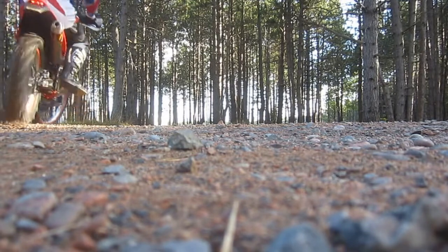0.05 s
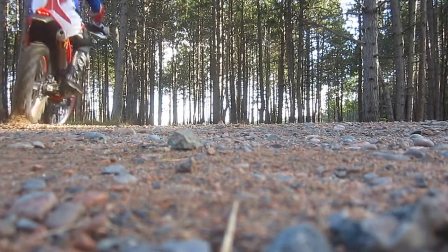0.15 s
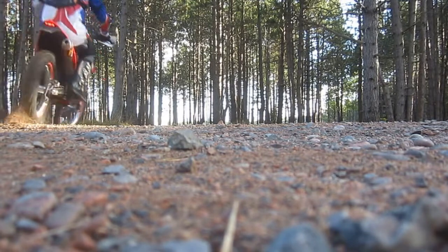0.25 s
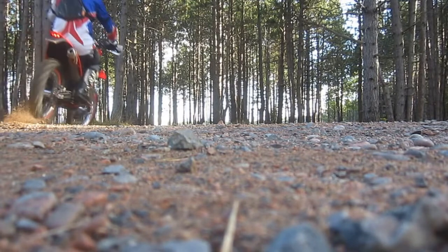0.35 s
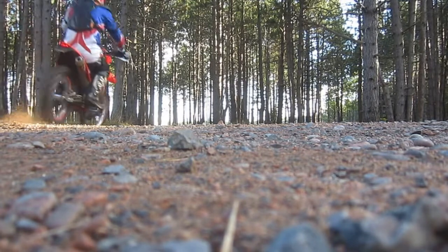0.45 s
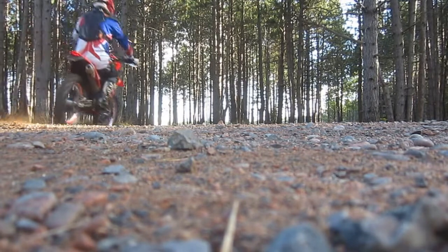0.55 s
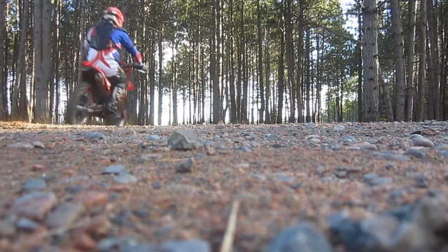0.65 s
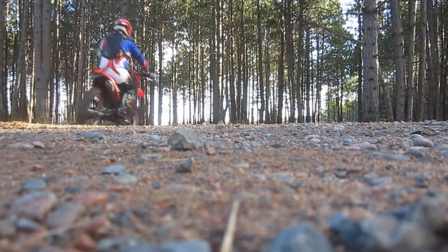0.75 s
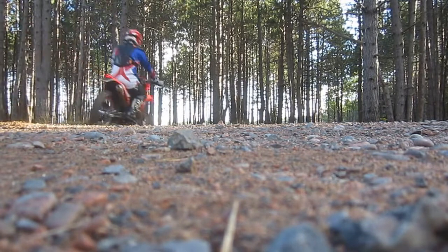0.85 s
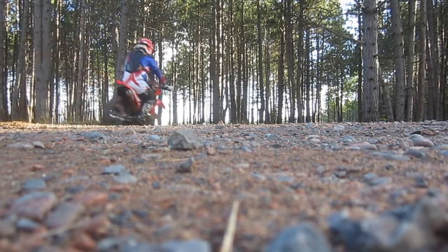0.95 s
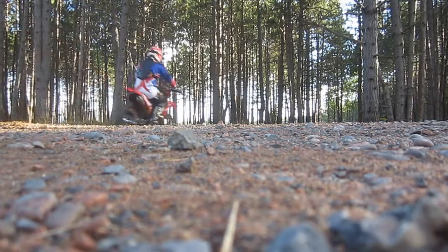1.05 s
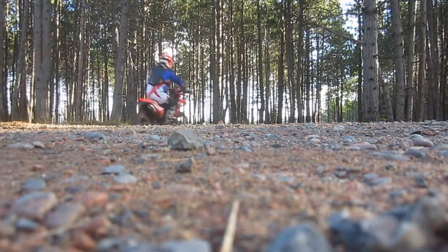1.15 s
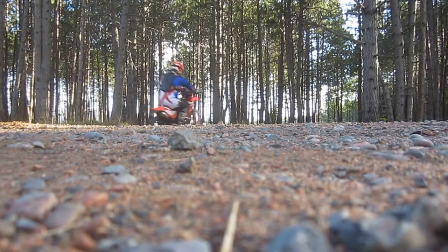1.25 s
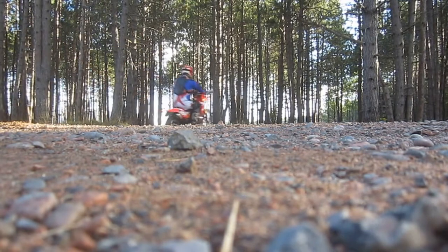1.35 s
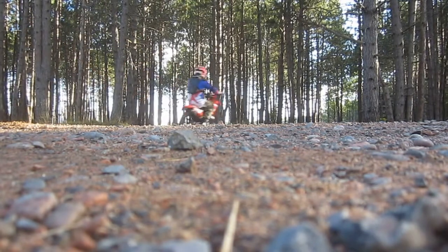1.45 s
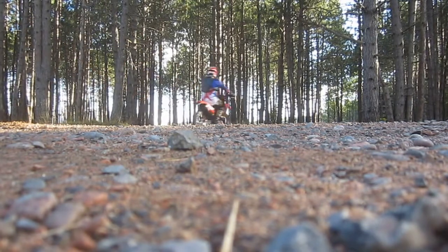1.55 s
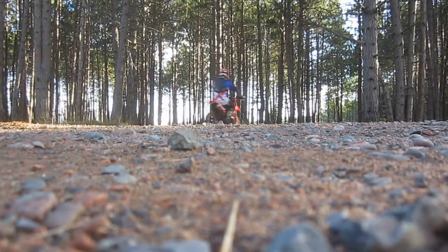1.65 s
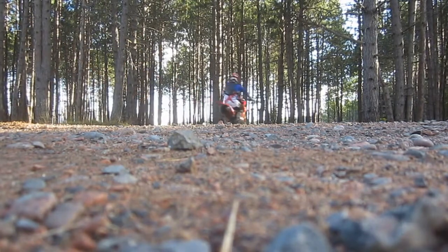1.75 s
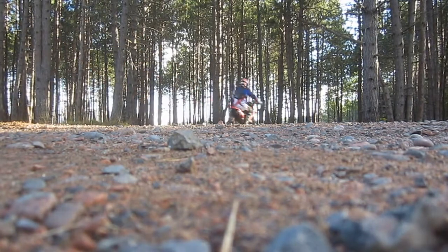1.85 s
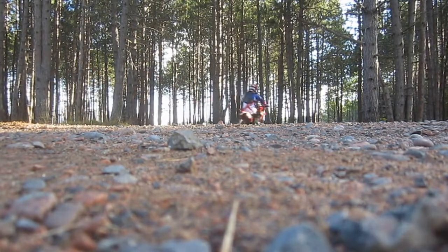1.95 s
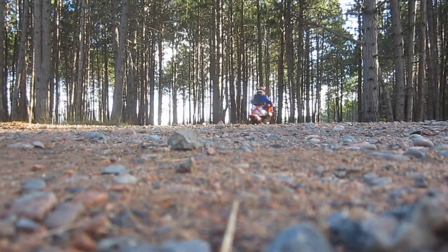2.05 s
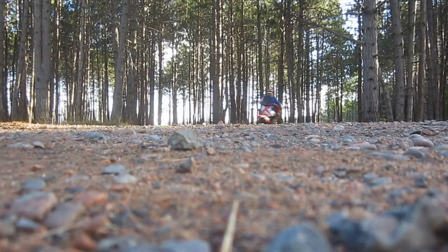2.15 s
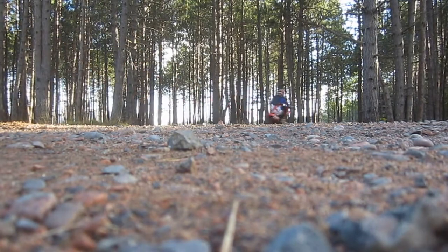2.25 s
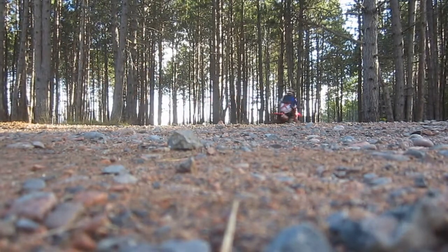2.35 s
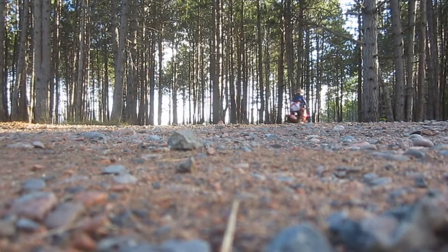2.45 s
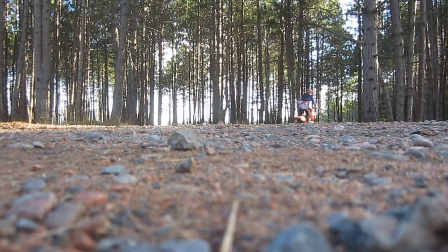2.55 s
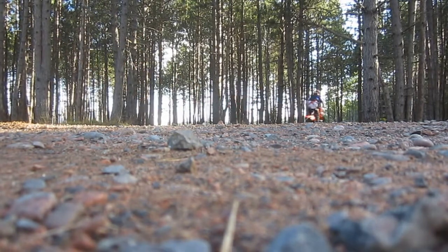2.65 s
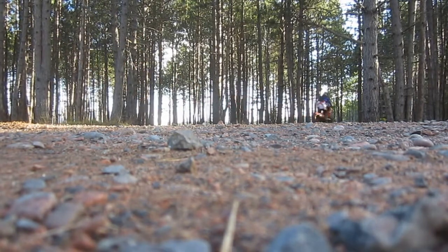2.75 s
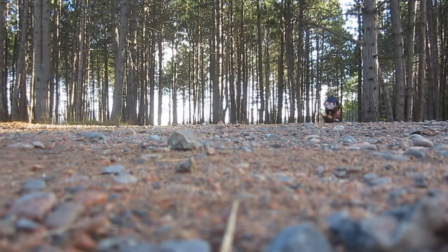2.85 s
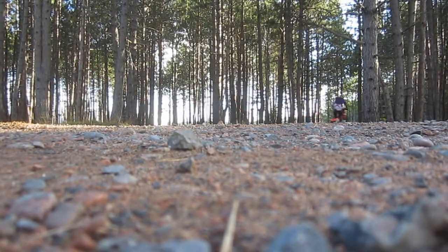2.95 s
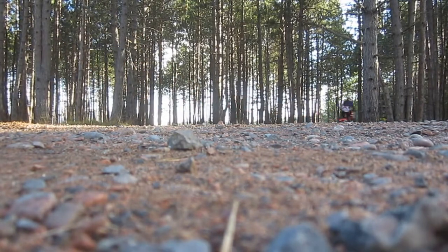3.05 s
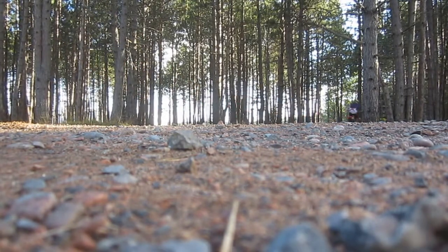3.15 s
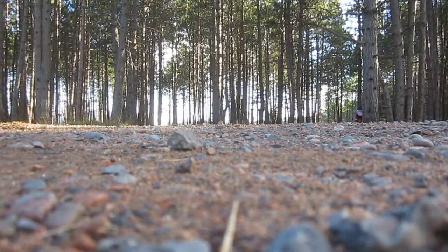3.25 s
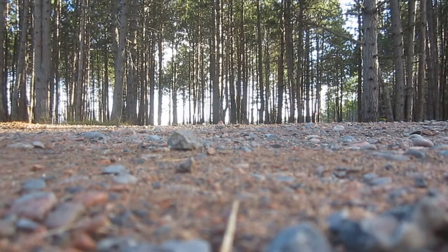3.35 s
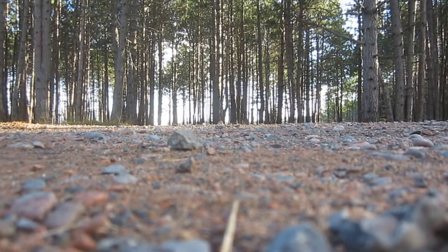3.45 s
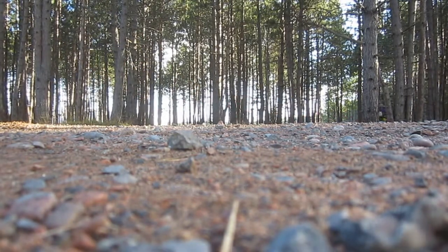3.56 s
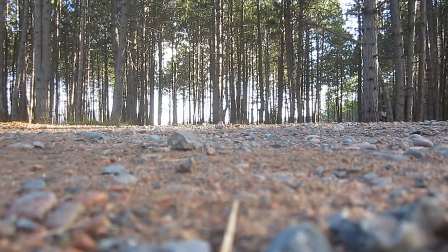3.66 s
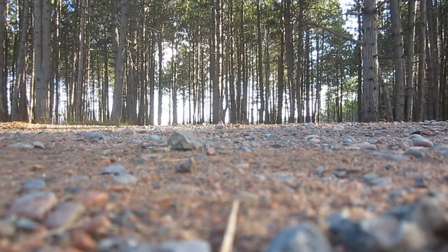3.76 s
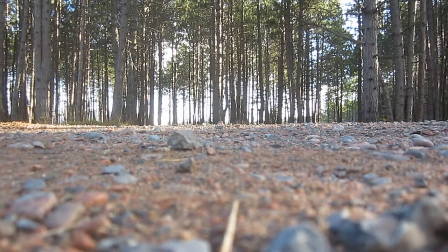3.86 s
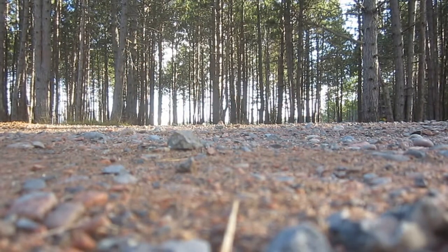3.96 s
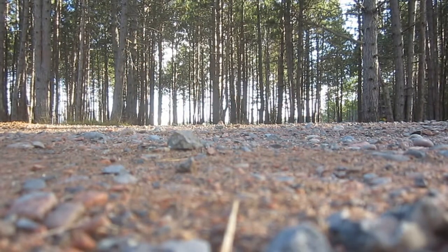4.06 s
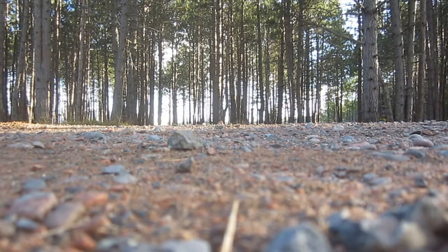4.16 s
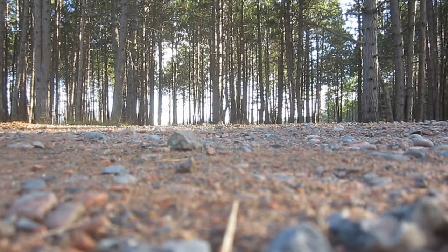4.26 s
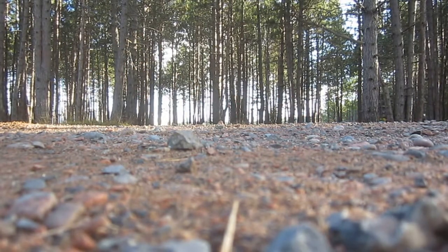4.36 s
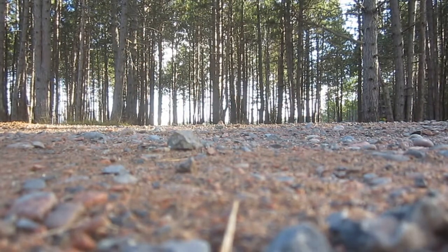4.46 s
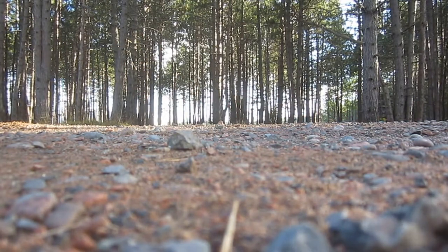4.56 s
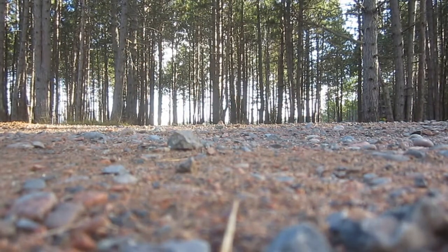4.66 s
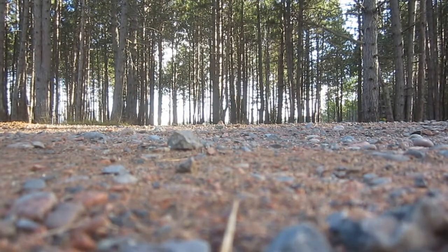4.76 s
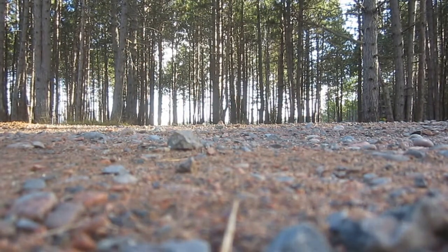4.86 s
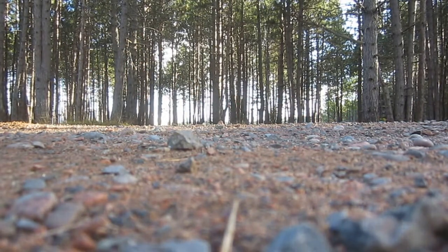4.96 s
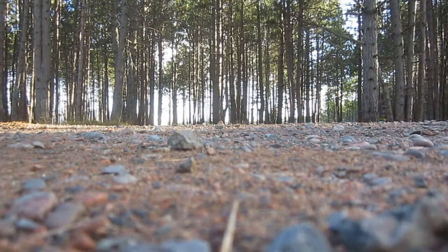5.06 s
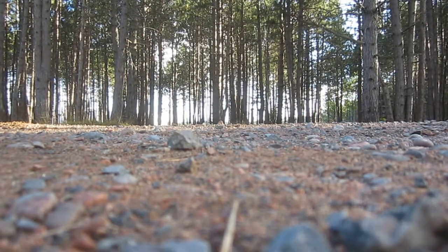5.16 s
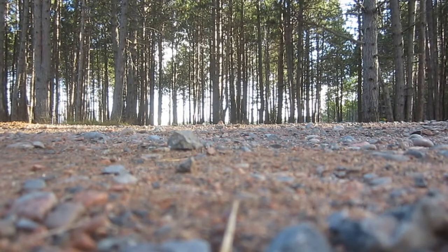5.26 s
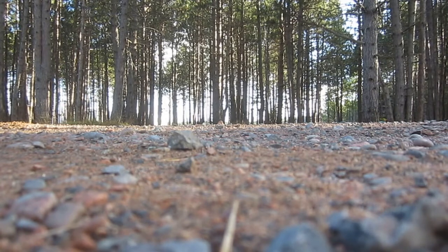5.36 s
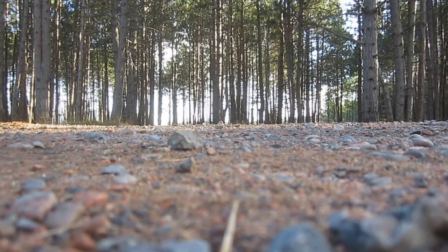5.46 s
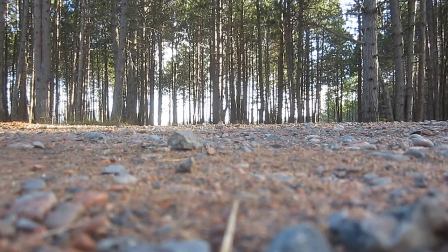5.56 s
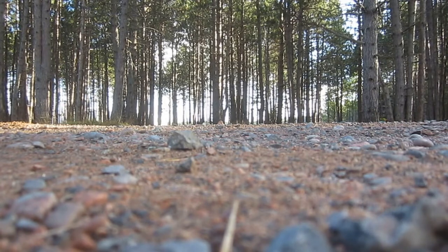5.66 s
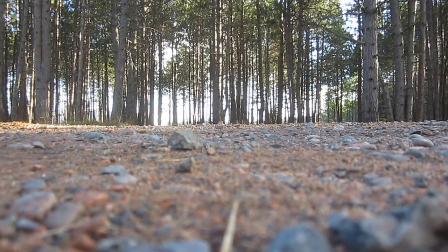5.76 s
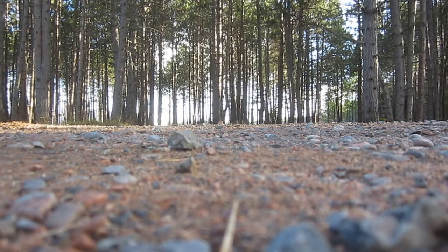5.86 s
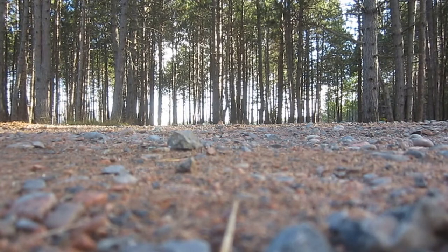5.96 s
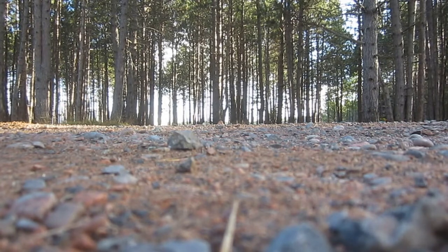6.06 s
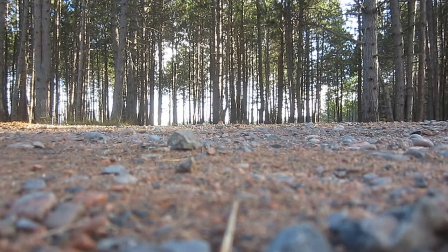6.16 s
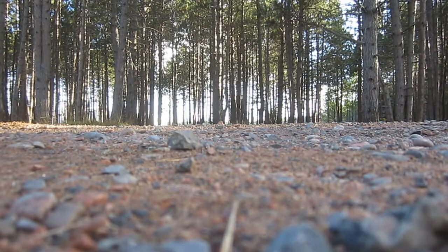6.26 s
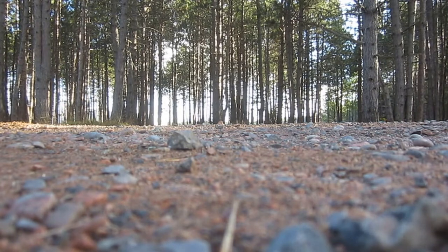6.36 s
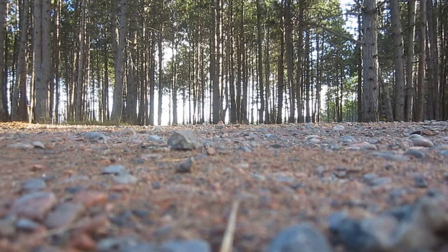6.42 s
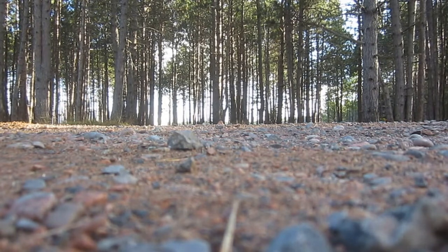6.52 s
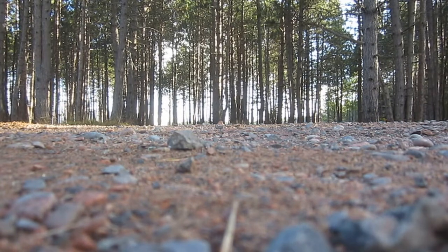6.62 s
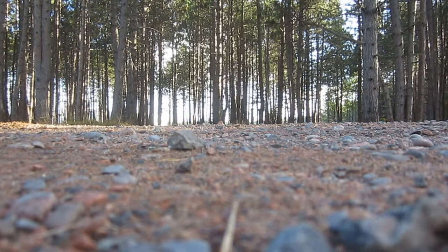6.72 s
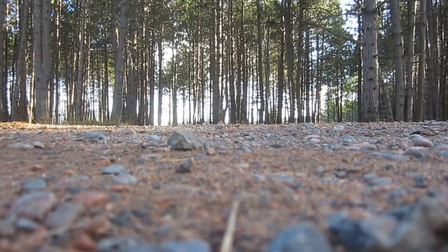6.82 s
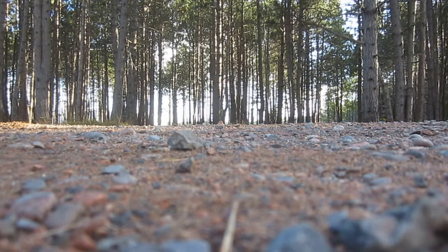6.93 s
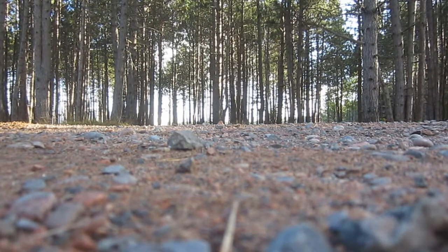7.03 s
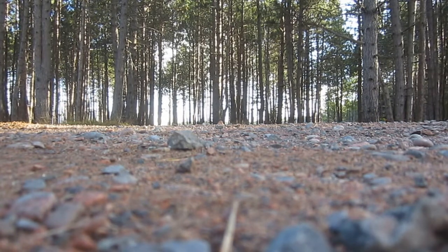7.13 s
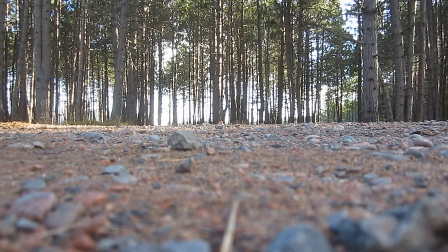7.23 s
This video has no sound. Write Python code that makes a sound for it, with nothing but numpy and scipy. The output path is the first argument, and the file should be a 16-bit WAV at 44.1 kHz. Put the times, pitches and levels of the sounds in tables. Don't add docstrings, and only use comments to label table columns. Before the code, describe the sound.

Very close to a ground microphone on a forest track, a two-stroke dirt motorcycle begins with several hard knocking bangs in the first 0.1 s, then a loud raspy pull until 0.4. The engine drops back while thrown stones clack and grit ticks from 0.45 to 0.8, with a tiny metallic ping. From 0.75 it labours low, then revs up loudly to 1.5; a few more stones land until 1.9. After a brief lull, a longer pull climbs from 1.9 to 2.9, leaping to a high wheelspin buzz near 2.95. A sharp rising blip follows at 3.2-3.35, a shorter one at 3.9-4.0, with odd pops between. Now far off and duller, it sputters from 4.7, pulls softly until 5.6, with a slight rev jump, then coasts down to a faint putter and thin hiss over quiet forest air until 7.3.

```python
import sys
import numpy as np
from scipy import signal
from scipy.fft import rfft, irfft, next_fast_len
from scipy.io import wavfile
from scipy.ndimage import uniform_filter1d, map_coordinates

SR = 44100
rng = np.random.default_rng(int(sys.argv[2]) if len(sys.argv) > 2 else 0)


def undo_db(level):
    steps = np.asarray(level, float) / 20
    return 10 ** steps


def to_wav(sig):
    pcm = np.clip(np.atleast_2d(sig), -1, 1) * 32767
    pcm = np.round(pcm).astype(np.int16)
    wavfile.write(sys.argv[1], SR, pcm.T)


N = 321489

# (time [s], peak level [dB])
LONE_BANGS = [(0.0313, -12.5), (0.0529, -12), (0.076, -27), (0.0968, -9.5), (0.756, -24), (0.7825, -12.5),
              (0.8134, -15.5), (1.858, -23), (1.8787, -17.5), (1.9012, -17), (2.9631, -15), (3.1809, -12.5),
              (3.663, -28), (3.679, -20), (3.7082, -40), (3.907, -14.5), (3.936, -13.5), (4.374, -26.5),
              (4.731, -22), (4.762, -20), (4.7892, -24), (4.803, -24), (4.8455, -22), (4.886, -22),
              (4.9296, -19), (4.9576, -22), (4.997, -21), (5.0391, -20), (5.0824, -20)]
# (time [s], aspect [0 side-on, 1 close behind, 2 down the track, 3 far in the trees])
PIPE_ASPECT = [(0, 1.37), (.14, 1.1), (.32, 1.12), (.8, 0.75), (1.04, 0.78), (1.13, 1.16), (1.25, .05),
               (1.42, 1.12), (2.3, 1.03), (2.5, 1.55), (2.75, 2.1), (2.9, 2.4), (3.3, 2.37), (4.02, 2.49),
               (4.3, 2.6), (5.1, 2.94), (5.55, 2.74), (7.29, 3.27)]
MEAN_HZ = 60
NEAR_S = 1.5


def unit(x):
    return x / np.sqrt(np.mean(x ** 2) + 1e-20)


def along(points, hz):
    f, v = np.transpose(points)
    return np.interp(np.log(hz + 1), np.log(f + 1), v)


def curves(rows):
    s, *columns = np.transpose(rows)
    t = np.arange(N) / SR
    return [np.interp(t, s, column) for column in columns]


def coloured(x, spectrum):
    m = next_fast_len(len(x) + 8192)
    gain = undo_db(along(spectrum, np.fft.rfftfreq(m, 1 / SR)))
    return irfft(rfft(x, m) * gain, m)[:len(x)]


def rush(spectrum, patchy_db):
    z = signal.stft(rng.standard_normal(N), nperseg=512)[2]
    field = uniform_filter1d(rng.standard_normal(z.shape), 6, 0)
    field = uniform_filter1d(field, 10, 1)
    patchy = signal.istft(z * undo_db(patchy_db * unit(field)), nperseg=512)[1][:N]
    return unit(coloured(patchy, spectrum))


def forest():
    # (frequency [Hz], level [dB per Hz])
    hush = [(18, -20), (30, -10), (69, 5), (111, -4.5), (202, 0), (308, -1.5), (748, -5.5), (1050, -5),
            (1400, -13), (3500, -19.5), (5600, -20), (10800, -36), (15500, -41)]
    return undo_db(-44) * rush(hush, patchy_db=1.7)


def trunks(x):
    # (frequency [Hz], time to fall 60 dB [s])
    tail_t60 = [(100, 0.26), (500, 0.29), (3000, 0.057), (10000, 0.033)]
    hz, t, z = signal.stft(rng.standard_normal(SR), SR, nperseg=256)
    fall = undo_db(-60 * t / along(tail_t60, hz)[:, None])
    tail = signal.istft(z * fall, SR, nperseg=256)[1]
    later = np.pad(x, (900, 0))
    return undo_db(-18) * signal.fftconvolve(later, tail / np.linalg.norm(tail))[:N]


def ping():
    # time [s], pitch [Hz], peak level [dB], time to fall 60 dB [s]
    s, hz, db, t60 = (.7995, 3860, -31, .025)
    t = np.clip(np.arange(N) / SR - s, 0, None)
    return undo_db(db - 60 * t / t60) * (1 - np.exp(-t / 0.00054)) * np.sin(2 * np.pi * hz * t)


def stones():
    # (time [s], peak level [dB], treble level [dB], time to fall 60 dB [s])
    landings = [(0.453, -35, -18, 0.03), (0.4904, -31.5, -18, 0.042), (0.51, -29.5, -11, 0.045),
                (0.516, -29, -9, 0.043), (0.5803, -33, -14, 0.045), (0.603, -22.5, -10, 0.023),
                (0.6451, -35, -17, 0.048), (0.7133, -38, -20, 0.048), (0.7698, -29, -16, 0.033),
                (1.5093, -29, -18, 0.04), (1.5846, -34, -30, 0.023), (1.616, -39, -29, 0.04),
                (1.6737, -31, -26, 0.031), (1.896, -29, -24, 0.037)]
    # (frequency [Hz], level [dB])
    clack = [(300, -11), (900, -4), (2300, 1), (4000, -6), (7000, -12.5), (9000, -49)]
    # (frequency [Hz], level [dB])
    grit = [(5000, -40), (7000, 12), (13000, 9), (16000, -3)]
    out, t = np.zeros(N + SR), np.arange(SR // 8) / SR
    for s, db, treble_db, t60 in landings:
        shape = undo_db(db - 2.0 - 60 * t / t60) * (1 - np.exp(-t / 0.0006))
        noise = rng.standard_normal((2, len(t)))
        burst = unit(coloured(noise[0], clack)) + undo_db(treble_db) * unit(coloured(noise[1], grit))
        out[round(s * SR):][:len(t)] += shape * burst
    return out[:N]


def engine():
    # (time [s], firing rate [Hz], exhaust level [dB], gas flow level [dB])
    coasts = [(.49, 61.3, -52, -44), (.69, 43.4, -53, -39.5), (1.668, 58.94, -63, -42.5),
              (1.78, 53.2, -84, -49), (3.65, 66.1, -40, -46), (3.8, 70.2, -42.5, -47), (4.36, 66, -61, -46),
              (4.601, 65.4, -46.5, -45.5), (6.05, 69.1, -56, -43), (6.6, 68.34, -52, -44.5),
              (6.96, 60.8, -66, -45), (7.29, 63.2, -58, -43.5)]
    pull_away = [
        (0, 45, -35, -40.5),
        (.1, 45.4, -25, -34.5),
        (.24, 56.76, -18.5, -30),
        (.32, 62.9, -20, -32),
        (.36, 67.9, -31, -34),
        (.4, 62.9, -54, -37.5),
    ]
    slide = [
        (0.732, 43, -41, -44.5),
        (0.791, 38.77, -21, -38),
        (0.889, 41.7, -27.5, -32.5),
        (0.989, 51.38, -17.5, -32),
        (1.182, 68.23, -21, -35),
        (1.26, 72.2, -26, -37.5),
        (1.44, 55.43, -25, -37),
        (1.521, 63.36, -26.5, -35.5),
        (1.538, 62.3, -69, -42.5),
    ]
    straight = [
        (1.871, 45.83, -45, -49),
        (1.91, 46.88, -28.5, -42),
        (1.989, 48.88, -28, -41),
        (2.15, 58.47, -22, -38),
        (2.27, 54.93, -24.5, -38),
        (2.351, 60.73, -20, -35.5),
        (2.548, 72.16, -18.5, -34.5),
        (2.72, 70.65, -23.5, -37),
        (2.782, 71.06, -20.5, -35.5),
    ]
    wheelspin = [
        (2.898, 98.8, -18, -29.5),
        (2.94, 108.5, -27.5, -30.5),
        (2.97, 105.1, -45, -33.5),
        (3.04, 90.2, -44, -37.5),
        (3.15, 67.3, -43, -46),
    ]
    blip = [
        (3.17, 62.5, -45, -43),
        (3.189, 65.9, -24.5, -41),
        (3.29, 94.8, -15.5, -37),
        (3.321, 94.9, -22.5, -34.5),
        (3.41, 86.9, -37.5, -37.5),
        (3.511, 66.43, -46, -45),
    ]
    short_blip = [
        (3.902, 64.7, -50, -46.5),
        (3.94, 71, -25.5, -43.5),
        (4.002, 80.3, -21.5, -37.5),
        (4.02, 80.4, -52, -39),
        (4.07, 86.5, -39, -40.5),
        (4.201, 70.5, -42.5, -46),
    ]
    far_pull = [
        (4.709, 68.2, -40, -45),
        (4.79, 72.2, -55, -45.5),
        (4.9, 73, -40, -42.5),
        (5.041, 73.7, -34, -41.5),
        (5.3, 73.7, -33.5, -42),
        (5.579, 89.8, -34, -38),
        (5.63, 85.7, -41, -38),
        (5.719, 80.6, -53, -40),
        (5.85, 76.4, -59, -43.5),
    ]
    return curves(sorted(pull_away + slide + straight + wheelspin + blip + short_blip + far_pull + coasts))


def throttle():
    # (opens [s], fires evenly from [s], shuts [s], size scatter then [dB])
    held_open = [
        (0, .11, .37, .6),
        (.77, .83, 1.52, .6),
        (1.87, 1.93, 2.95, .5),
        (3.17, 3.22, 3.34, .8),
        (3.9, 3.95, 4.01, .6),
        (4.72, 5.2, 5.6, 1.1),
    ]
    settle_s, misfire_db = 0.023, 3
    t, opened, scatter_db = np.arange(N) / SR, np.zeros(N), np.full(N, float(misfire_db))
    for opens, evenly, shuts, even_db in held_open:
        opened[(t >= opens) & (t < shuts)] = 1
        scatter_db[(t >= evenly) & (t < shuts)] = even_db
    keep = np.exp(-1 / (SR * settle_s))
    return signal.lfilter([1 - keep], [1, -keep], opened, zi=[keep])[0], scatter_db


def crank():
    rate = engine()[0]
    turns = np.cumsum(rate) / SR
    bang_at = np.round(np.array(LONE_BANGS)[:, 0] * SR).astype(int)
    whole = np.cumsum(np.round(np.diff(turns[bang_at], prepend=0)))
    return rate, turns + np.interp(np.arange(N), bang_at, whole - turns[bang_at])


def firings(turns):
    at = np.flatnonzero(np.diff(np.floor(turns + 1e-6)) > 0) + 1
    return at, np.clip(rng.standard_normal(1000)[:len(at)], -2, 2)


def intake(turns):
    open_db, shut_db, far_db, far_from_s = -45, -71, -52.5, 3.03
    t = np.arange(N) / SR
    near_db = shut_db + (open_db - shut_db) * throttle()[0]
    waver_db = 1.5 * map_coordinates(rng.standard_normal(80), [t * 9])
    hum_db = uniform_filter1d(np.where(t < far_from_s, near_db, far_db), size=3000) + waver_db
    return np.sqrt(2) * undo_db(hum_db) * np.sin(2 * np.pi * turns)


def throbbing(rate, at, luck):
    kicks = np.zeros(N)
    kicks[at - 100] = undo_db(3 * luck) * np.sqrt(SR / rate[at])
    flare = np.convolve(kicks, undo_db(-60 * np.arange(2000) / SR / 0.15))[:N]
    flare = flare / np.sqrt(np.abs(uniform_filter1d(flare ** 2, size=4000)) + 1e-9)
    fade_s, far_share = 2.9, 0.11
    share = np.clip(1 - np.arange(N) / SR / fade_s, far_share, 1)
    return share * (flare - 1)


def follows(law):
    db, per_flow, per_octave, open_db, near_open_db, first_db, per_s, per_aspect = law
    mean_flow_db, lag_s = -42, .038
    rate, _, flow_db = engine()
    t = np.arange(N) / SR
    drive_db = per_flow * (flow_db - mean_flow_db) + per_octave * np.log2(rate / MEAN_HZ)
    late_db = np.interp(t - lag_s, t, drive_db)
    near = np.exp(-t / NEAR_S)
    throttle_db = (open_db + near_open_db * near) * throttle()[0]
    turned = uniform_filter1d(np.clip(curves(PIPE_ASPECT)[0], 0, 2), size=9000)
    return undo_db(db + late_db + throttle_db + first_db * near + per_s * t + per_aspect * turned)


def chain_rasp(throb):
    # (frequency [Hz], level [dB per Hz])
    rasp = [(350, -11), (600, -3), (870, -6), (1100, -7), (1450, -6.5), (1900, -10.5), (2200, -13.5),
            (2500, -13.5), (2900, -17.5), (4200, -23), (7000, -120)]
    return undo_db(engine()[2]) * (1 + 0.41 * throb) * rush(rasp, patchy_db=0.5)


def cooling_fins(throb):
    # (frequency [Hz], level [dB per Hz])
    sizzle = [(1650, -13), (2800, -4.5), (3980, -3.5), (5250, 0), (6950, -7), (8000, -8), (10400, -11.5),
              (17600, -120)]
    fin_law = (-54.5, 1.0241, 3, 4, -2.9, -9.5, -1, 3)
    return follows(fin_law) * (1 + 0.23 * throb) * rush(sizzle, patchy_db=1.5)


def bang_puffs():
    # (time [s], hiss level [dB])
    puffs = [
        (0.0283, -40),
        (0.0476, -56),
        (0.0927, -34),
        (0.7781, -35.5),
        (0.833, -43),
        (1.874, -48),
        (2.959, -29),
        (3.1762, -45),
        (3.699, -47),
    ]
    out, t = np.zeros(N + SR), np.arange(SR // 3) / SR
    for s, db in puffs:
        smear = .008 * max(s - NEAR_S, .01)
        fall = undo_db(-60 * t / (0.12 + 8 * smear))
        out[round((s - smear) * SR):][:len(t)] += undo_db(db - 6) * fall * (1 - np.exp(-t / smear))
    return out[:N]


def gas_jet(throb):
    # (frequency [Hz], level [dB per Hz])
    close_hiss = [(4400, -21), (7500, -5), (9500, -0.5), (11500, 1.5), (13500, -3.5), (15500, -10.5)]
    # (frequency [Hz], level [dB per Hz])
    far_hiss = [(4400, -31), (7500, -5), (9500, -8), (11500, -4.5), (13500, -14), (15500, -20)]
    jet_law = (-57.5, 0.52, 3, 5.5, 4.5, -3, -2.17, 1.97)
    far = np.clip(curves(PIPE_ASPECT)[0] - 1.4, 0, 1)
    hiss = np.sqrt(1 - far) * rush(close_hiss, patchy_db=-1.2) + np.sqrt(far) * rush(far_hiss, patchy_db=-0.2)
    return (follows(jet_law) * (1 + 0.98 * throb) + bang_puffs()) * hiss


def pulsed(x, spectrum, lead):
    m = next_fast_len(len(x) + 8192)
    hz = np.fft.rfftfreq(m, 1 / SR)
    ahead_s = .0072
    pair = 1 + lead / (1 + (hz / 520) ** 4) * np.exp(2j * np.pi * hz * ahead_s)
    timing = pair / np.abs(pair)
    gain = undo_db(along(spectrum, hz))
    gain = gain / np.sqrt(np.mean(gain ** 2))
    return irfft(rfft(x, m) * gain * timing, m)[:len(x)]


def chamber_shell(rate, at, size, aspect):
    # (frequency [Hz], level [dB])
    wall = [(300, -120), (600, -11), (860, -0.5), (1080, -18), (1520, 0), (2100, -28), (2570, -6.5),
            (4500, -120)]
    lag_s = .0024
    knock = size * np.clip(3 - aspect, 0, 1) * rate[at] / MEAN_HZ
    knocks = np.bincount(at + round(lag_s * SR), knock, N)[:N]
    return undo_db(-20.5) * pulsed(knocks, wall, 0)


def exhaust(rate, at, luck):
    # (frequency [Hz], level [dB])
    pipe_colours = [
        [(40, -40), (80, 1), (135, 6), (210, 10), (285, -18), (355, 16), (500, 17), (570, 12.5), (640, -46),
         (800, 11), (1400, -10), (2000, -3), (2500, -14), (7000, -120)],
        [(40, -49), (70, -26), (100, -1), (170, -6), (235, 6), (285, 8), (345, -7), (400, 0), (470, 3),
         (560, -6), (680, -15.5), (850, -42), (1400, -49.5), (7000, -120)],
        [(40, -44), (80, -40), (125, 3.5), (205, -35), (255, 4), (295, 8.5), (345, 0), (430, -1), (520, -8),
         (650, -13), (850, -41.5), (1450, -51.5), (2500, -67), (7000, -120)],
        [(40, -32), (80, -13.5), (140, 2), (225, 7.5), (262, -4), (300, -12.5), (400, -14), (500, -9),
         (800, -54), (1500, -59), (5000, -120)],
    ]
    puff_strength = [.4, .85, 1.6, .5]
    scatter_db = throttle()[1][at]
    aspect = np.clip(curves(PIPE_ASPECT)[0][at], 0, 3)
    size = undo_db(engine()[1][at] + scatter_db * luck) * np.sqrt(SR / rate[at])
    bangs = np.array(LONE_BANGS)
    nearest = np.abs(at[:, None] - bangs[:, 0] * SR).argmin(axis=0)
    size[nearest] = undo_db(bangs[:, 1] + 19)
    out = chamber_shell(rate, at, size, aspect)
    for k, colour in enumerate(pipe_colours):
        share = np.clip(1 - np.abs(aspect - k), 0, 1)
        out = out + pulsed(np.bincount(at, size * share, N), colour, puff_strength[k])
    return out


def scene():
    rate, turns = crank()
    at, luck = firings(turns)
    pulses = exhaust(rate, at, luck) + stones() + ping()
    throb = throbbing(rate, at, luck)
    clatter = chain_rasp(throb) + cooling_fins(throb) + gas_jet(throb)
    return (forest() + trunks(pulses) + intake(turns) + clatter + pulses)[None]


def low_pass(x):
    return signal.sosfilt(signal.butter(12, 15690, fs=SR, output="sos"), x)


def record(dry):
    # (frequency [Hz], level [dB])
    response = [(10, -40), (25, -7), (45, -2.5), (60, 1), (20000, -2.5)]
    heard = coloured(dry[0], response)[None]
    top = .5
    rounded = heard / (1 + np.abs(heard / top) ** 3) ** (1 / 3)
    return low_pass(rounded)


dry = scene()
out = record(dry)
to_wav(out)
```